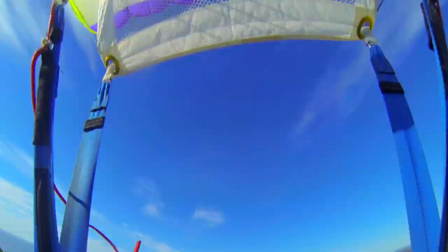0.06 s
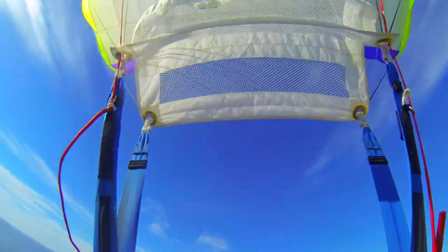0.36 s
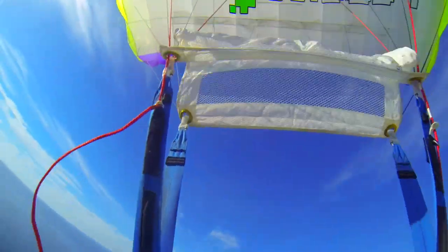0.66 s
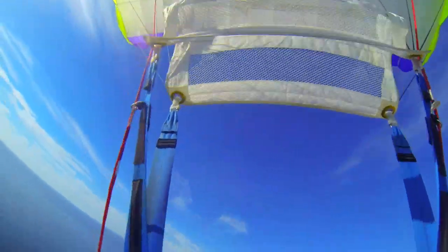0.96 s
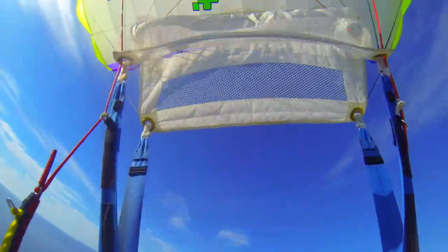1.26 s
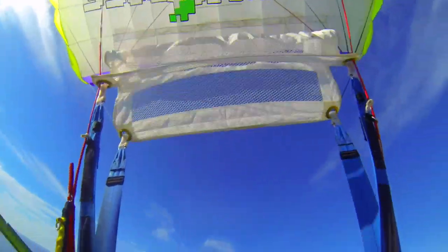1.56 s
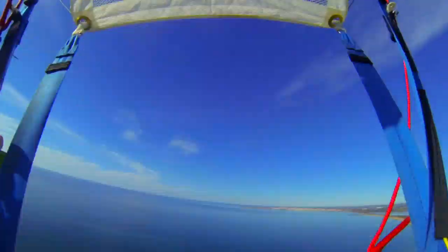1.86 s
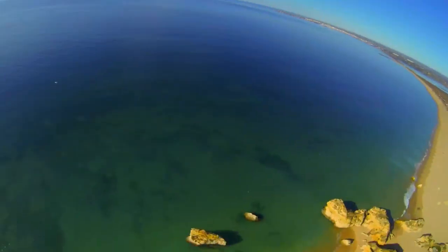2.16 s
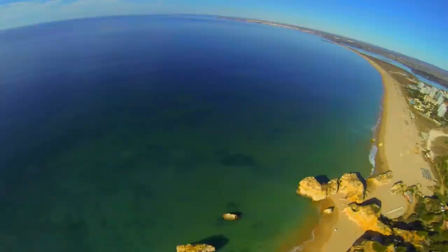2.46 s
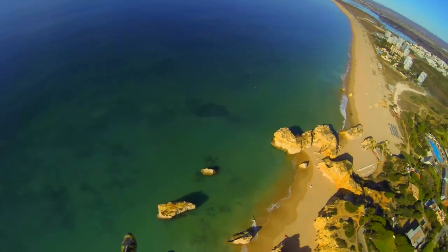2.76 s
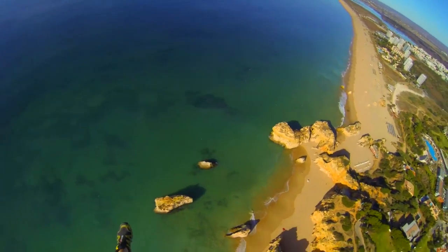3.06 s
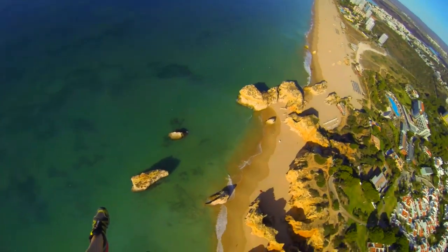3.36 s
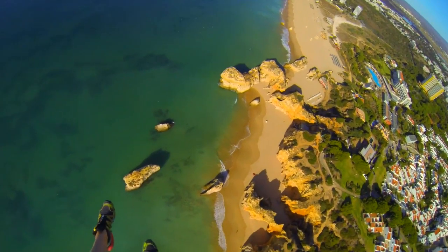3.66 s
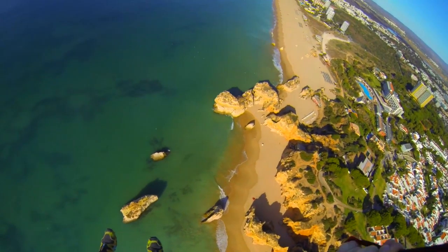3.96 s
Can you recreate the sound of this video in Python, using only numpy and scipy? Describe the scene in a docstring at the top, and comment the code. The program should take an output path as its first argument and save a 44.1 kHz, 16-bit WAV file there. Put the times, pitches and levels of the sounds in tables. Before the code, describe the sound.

A hollow rush of air buffets a camera microphone during a paraglider flight while the wing rustles lightly. Close bumps and rubs on the case lead to a loud knock, a brief lull and a sharp snap, then the wind comes back.

```python
"""Under a paraglider, above the coast. Air rushes past a small cased camera and buffets its microphone
with a low boom. A line sings faintly in the wind; the fabric rustles, ticks and swishes.
A hand turns the camera from the wing to the coast below: the case is bumped, knocked and rubbed,
and a finger slips off with a snap. The rush dips just after the loudest knock, then comes back."""
import sys
import numpy as np
from scipy import signal
from scipy.fft import rfft, irfft
from scipy.io import wavfile
from scipy.ndimage import uniform_filter1d

SR = 44100
rng = np.random.default_rng(int(sys.argv[2]) if len(sys.argv) > 2 else 0)


def file_out(sig):
    """Save sig as 16-bit WAV at sys.argv[1]."""
    # one column per channel
    cols = np.atleast_2d(sig).T
    # limit, then scale
    lim = np.clip(cols, -1, 1)
    pcm = np.round(lim * 32767).astype(np.int16)
    wavfile.write(sys.argv[1], SR, pcm)


N = 176400
CLICK_ATTACK_S = 0.00046  # shared by ticks, knocks and the snap


def undb(db):
    """Decibels to gain."""
    return 10 ** (np.asarray(db) / 20)


def noise():
    """White noise at unit level."""
    return rng.standard_normal(N)


def wobble(rate_hz, depth_db):
    """A wandering gain: random sample-and-hold, smoothed twice."""
    hold = int(SR / rate_hz)
    steps = np.repeat(rng.standard_normal(N // hold + 1), hold)
    drift = uniform_filter1d(uniform_filter1d(steps, hold), hold)[:N]
    return undb(depth_db * drift / drift.std())


def colour(x, curve, lo=0, hi=np.inf):
    """Minimum-phase EQ along a (Hz, dB) curve, limited to a band; white noise keeps its level."""
    f = np.maximum(np.arange(N // 2 + 1) * SR / N, 1)
    hz, db = np.array(curve).T
    gain = undb(np.interp(np.log(f), np.log(hz), db)) / (1 + (lo / f) ** 10 + (f / hi) ** 10) + 1e-6
    cepstrum = irfft(np.log(gain / np.sqrt(np.mean(gain ** 2))), N)
    cepstrum[1:N // 2] *= 2
    cepstrum[N // 2 + 1:] = 0
    impulse = irfft(np.exp(rfft(cepstrum)), N)[:N // 10]
    return signal.fftconvolve(x, impulse)[:N]


def resonate(x, hz, width_hz):
    """One resonant peak; white noise keeps its level."""
    return signal.lfilter(*signal.iirpeak(hz, hz / width_hz, SR), x) * np.sqrt(SR / np.pi / width_hz)


def envelope(age, attack, hold, release):
    """Linear attack, then an exponential release once the age passes hold."""
    return np.clip(age / attack, 0, 1) * np.exp(-np.clip((age - hold) / release, 0, 20))


def swell(offset, half_width):
    """A bell-shaped fade in and out."""
    return np.exp(-np.minimum((offset / half_width) ** 2 / 2, 20))


def grains(per_s, spread_db):
    """Random clicks of uneven size, at unit level overall."""
    clicks = (rng.random(N) < per_s / SR) * np.sign(noise())
    clicks *= undb(spread_db * np.minimum(rng.exponential(size=N), 4))
    return clicks / clicks.std()


# EQ of the rushing air inside the case (frequency [Hz], level [dB])
RUSH_EQ = [(150, 4.5), (330, -6.5), (430, -11.5), (600, -6.5), (780, 0.5), (960, -9), (1200, -2.5),
           (1380, -3), (1560, 1), (1830, -1.5), (2020, -3.5), (2300, -0.5), (2560, -3.5), (2850, -22),
           (3500, -13.5), (6000, -65.5)]


def rush():
    """Air streams past the case: hollow noise with a fast flicker."""
    return wobble(rate_hz=70, depth_db=2) * colour(noise(), RUSH_EQ)


# bright EQ of air hiss and fabric (frequency [Hz], level [dB])
HISS_EQ = [(2200, -39), (2900, 4.5), (3400, -4.5), (3900, 5), (4550, -5.5), (5050, -1.5), (5700, -8.5),
           (6500, -11.5), (7600, -9.5), (9200, -12), (10500, -21), (12500, -17), (15000, -44)]
FABRIC_DECAY_S = 0.0021


def hiss():
    """The airy top of the wind, roughened by tiny bursts of rustle."""
    clicks = abs(grains(per_s=58, spread_db=1.5))
    rustle = signal.lfilter([1], [1, -np.exp(-1 / (FABRIC_DECAY_S * SR))], clicks)
    return colour(noise() * (1 + undb(-7) * rustle / rustle.std()), HISS_EQ)


def singing_line():
    """A line sings in the wind on one breathy pitch."""
    return undb(-2) * resonate(noise(), hz=295.3, width_hz=11.5)


# bass-heavy EQ of the buffeting (frequency [Hz], level [dB])
BUFFET_EQ = [(12, -12), (28, 5), (52, -7.5), (73, 0.5), (92, 4), (120, -8), (170, -16.5), (260, -24),
             (380, -27), (700, -34.5), (2000, -109)]


def buffeting():
    """Air churns on the microphone in an unsteady rumble."""
    return wobble(rate_hz=24.91, depth_db=1) * colour(noise(), BUFFET_EQ)


# fader moves of the wind bed (time [s], rush [dB], hiss [dB], buffeting [dB])
WIND_FADERS = [(0, -63, -74.5, -43.5), (.1, -54.5, -68.5, -31.5), (.36, -55, -66.5, -31.5),
               (.48, -54, -71, -40.5), (.62, -53.5, -66, -32), (.78, -50, -64.5, -33.5),
               (1.05, -50.5, -63, -31), (1.33, -52, -65, -35), (1.46, -50.5, -65, -30),
               (1.58, -54, -62.5, -37), (1.88, -49, -63, -29), (2.02, -42.5, -56, -24),
               (2.13, -50.5, -65, -35.5), (2.28, -64.5, -77, -43.5), (2.41, -60, -74.5, -50),
               (2.519, -52.5, -70, -50), (2.87, -59, -77, -42), (3.06, -49.5, -65, -37),
               (3.2, -56, -70, -33.5), (3.6, -54, -68, -31.5), (4, -54, -71, -32.5)]


def wind(t):
    """The wind bed swells and dips; rush and hiss gust together, the line follows the rush fader."""
    times, *levels = np.array(WIND_FADERS).T
    rush_gain, hiss_gain, buffet_gain = (undb(np.interp(t, times, db)) for db in levels)
    gust = wobble(rate_hz=12.053, depth_db=1.47)
    air = rush_gain * rush() + hiss_gain * hiss()
    return gust * air + rush_gain * singing_line() + buffet_gain * buffeting()


# soft fabric swishes (peak time [s], half width [s], hiss [dB], resonance [Hz], resonance level [dB])
SWISH_CUES = [(.77, .025, -64, 1900, -57), (1.46, .022, -62, 7800, -69), (1.99, .035, -56, 4300, -62),
              (2.985, .04, -66, 4700, -58)]


def fabric_swishes(t):
    """Fabric slides: a rounded swell of hiss with one broad resonance."""
    bright, white, swishes = colour(noise(), HISS_EQ), noise(), 0
    for peak_time, half_width, hiss_db, hz, resonance_db in SWISH_CUES:
        texture = undb(hiss_db) * bright + undb(resonance_db) * resonate(white, hz, width_hz=400)
        swishes += swell(t - peak_time, half_width) * texture
    return swishes


# sharp ticks of the wing (time [s], level [dB])
TICK_CUES = [(.170, -52), (0.426, -48.5), (0.451, -52), (.843, -54), (0.878, -47), (.894, -56),
             (1.105, -50), (.976, -39), (1.848, -43.5)]


def fabric_ticks(t):
    """The wing's fabric flicks in short, bright bursts of noise."""
    bursts = sum(undb(db) * envelope(t - start, CLICK_ATTACK_S, 0, FABRIC_DECAY_S)
                 for start, db in TICK_CUES)
    return colour(noise() * bursts, HISS_EQ)


# low modes of case and microphone (frequency [Hz], time to fall 60 dB [s], level [dB])
BOOM_MODES = [(73.2, 0.15, 0.5), (51.3, 0.032, -0.5), (102, 0.058, -8)]


def boom(t, cues, half_width_s, attack_s=0.002):
    """Each rounded push rings the low modes for a few cycles."""
    ring = sum(undb(db) * np.sin(2 * np.pi * hz * t) * np.exp(-np.log(1000) * t / t60)
               for hz, t60, db in BOOM_MODES)
    pushes = np.zeros(N)
    for time, db in cues:
        push = swell(t - time, half_width_s)
        pushes += undb(db) * push / push.sum()
    return signal.fftconvolve(pushes, ring * np.minimum(t / attack_s, 1))[:N]


# puffs of air on the microphone (time [s], push level [dB])
PUFF_CUES = [(0.898, -21.5), (.914, -20), (0.928, -15.5), (0.985, -10), (1.011, -13.5), (1.026, -20.5),
             (1.179, -22.5), (1.93, -22), (2.02, -15), (3.646, -13.5), (3.782, -12), (3.908, -17)]


def air_puffs(t):
    """Wide, soft pushes of air set off the boom."""
    return boom(t, PUFF_CUES, half_width_s=0.0022)


# bumps of hand and harness (time [s], push level [dB])
BUMP_CUES = [(.105, -25), (0.118, -17), (0.238, -15), (0.285, -12.5), (0.294, -30), (1.420, -17),
             (2.081, -13), (2.092, -11), (2.164, -8), (2.465, -23.5), (2.593, -18.5), (2.607, -17),
             (2.623, -17), (2.636, -13), (2.799, -31), (2.814, -19.5), (3.166, -23), (3.35, -27),
             (3.373, -16.5), (3.390, -20), (3.77, -19.5)]


def bumps(t):
    """Short jolts to the case set off the boom."""
    return boom(t, BUMP_CUES, half_width_s=0.0006)


def band_gains(body_db, mid_db, treble_db):
    """Four band gains for one contact; the upper mids are set from mids and treble."""
    upper_mid_db = mid_db + 0.37 * (treble_db - mid_db) - 2.5
    return undb([body_db, mid_db, upper_mid_db, treble_db])[:, None]


# EQ of the case when touched (frequency [Hz], level [dB])
CASE_EQ = [(150, 5.5), (350, -3), (470, -1), (580, -5), (740, -3.5), (950, -7.5), (1250, -0.5),
           (1600, -3.5), (1850, -4.5), (2300, -8.5), (2900, -13), (3400, -16.5), (4300, -20), (5000, -25.5),
           (5600, -29.5), (7000, -35), (9500, -33.5), (11500, -40.5), (15000, -62)]
# edges of the body, mid, upper mid and treble bands (frequency [Hz])
CASE_BANDS = [150, 950, 1700, 2900, 16000]
# early reflections inside the case (delay [s], gain [linear])
CASE_ECHOES = [(.00113, .3), (.00271, -0.25), (.0043, 0.087)]


def case(forces):
    """The case colours contact forces in four bands; all but the lowest echo inside it."""
    bands = zip(forces, CASE_BANDS, CASE_BANDS[1:])
    body, *upper = (colour(force, CASE_EQ, lo, hi) for force, lo, hi in bands)
    direct, n = sum(upper), np.arange(N)
    echoes = sum(gain * np.interp(n - delay * SR, n, direct, left=0) for delay, gain in CASE_ECHOES)
    return body + (direct + echoes) / np.sqrt(1 + sum(gain ** 2 for _, gain in CASE_ECHOES))


# hand, sleeve and straps sliding on the case
# (time [s], length [s], release [s], body [dB], mids [dB], treble [dB], squeak [Hz], squeak level [dB])
RUB_CUES = [(0.098, 0.045, .015, -40.5, -57, -74, 336, -43.5),
            (0.275, 0.043, .03, -41.5, -42, -60, 2280, -50.5),
            (2.026, .1, 0.0084, -42.5, -46, -62, 1600, -59),
            (2.157, 0.0083, 0.061, -38.5, -49.5, -81, 1900, -54),
            (2.59, 0.021, .005, -32, -32.5, -31.5, 1816, -30),
            (2.600, 0.0073, 0.005, -42, -44, -38, 1810, -23),
            (2.618, 0.0066, 0.0018, -28, -27, -27, 1760, -25),
            (2.628, 0.0069, 0.0022, -30.5, -30.5, -27.5, 1778, -31),
            (2.652, 0.0063, 0.0025, -46, -46, -38.5, 7900, -46),
            (2.643, 0.047, .008, -47, -54.5, -59, 1800, -61),
            (3.29, 0.087, 0.011, -51, -51.5, -62.5, 1810, -59),
            (3.342, 0.041, 0.0079, -35, -37.5, -40, 1880, -43),
            (3.383, 0.024, 0.0081, -34.5, -35, -44.5, 687, -32.5),
            (3.408, 0.022, 0.0023, -41, -44, -49, 2030, -43)]


def rubs(t):
    """Stick-slip grains scrape the case in uneven catches; each grip squeaks at its own resonance."""
    friction = grains(per_s=1500, spread_db=2.5) + 0.97 * noise()
    friction *= wobble(rate_hz=350, depth_db=3)  # the slide catches and slips
    friction /= friction.std()
    forces, squeaks = 0, 0
    for start, length, release, *band_db, hz, squeak_db in RUB_CUES:
        scrape = friction * envelope(t - start, attack=0.0027, hold=length, release=release)
        forces += band_gains(*band_db) * scrape
        squeaks += undb(squeak_db) * resonate(scrape, hz, width_hz=65)
    return case(forces) + squeaks


def finger_snap(t, start_s=2.631, hz=1760, decay_s=0.0014, level_db=-8.5):
    """The gripping finger slips off: one hard snap that rings the case briefly."""
    age = t - start_s
    shape = envelope(age, CLICK_ATTACK_S, CLICK_ATTACK_S, decay_s)
    return undb(level_db) * shape * np.sin(2 * np.pi * hz * age)


# knocks on the case (time [s], decay [s], body [dB], mids [dB], treble [dB])
KNOCK_CUES = [(0.048, 0.0051, -39, -43, -74), (0.07, 0.0049, -40, -45.5, -51.5),
              (0.1246, 0.0016, -32, -33.5, -37.5), (0.131, 0.004, -27.5, -38, -62),
              (0.24, 0.004, -16, -33, -48), (.254, 0.014, -30.5, -44, -57),
              (0.284, 0.0056, -15, -22.5, -56), (1.377, 0.0064, -38.5, -58, -72),
              (1.419, 0.011, -33, -45, -74), (2.082, 0.0079, -18, -38, -54), (2.104, .008, -27, -34, -51),
              (2.113, 0.0054, -18.5, -23.5, -43), (2.145, 0.0028, -3, -10.5, -39),
              (2.147, .003, -39, -30, -34), (2.167, 0.0016, -20, -29.5, -37),
              (2.244, 0.0042, -26.5, -42, -56.5), (2.303, 0.013, -46, -56, -64),
              (2.383, 0.0058, -45, -53, -72), (2.568, .012, -42, -60, -76),
              (2.467, 0.0042, -27.5, -43, -53), (2.474, 0.0024, -37, -36, -30.5),
              (2.619, 0.0032, -49, -20.5, -21.5), (2.629, 0.0031, -14, -24, -26),
              (2.715, 0.0013, -50, -44, -48), (2.766, .004, -53, -54, -47.5),
              (2.803, 0.0052, -28, -29.5, -33.5), (2.870, 0.0024, -43, -51, -69),
              (3.150, .005, -38.5, -53, -57), (3.168, 0.0045, -31.5, -48, -61),
              (3.276, 0.0034, -31, -36.5, -49), (3.347, 0.002, -21, -34, -51),
              (3.369, .004, -16.5, -26, -59), (3.396, 0.0048, -14, -32, -49), (3.409, .005, -31, -38, -42),
              (3.693, 0.0053, -25, -36, -51), (3.762, 0.008, -32, -63, -72),
              (3.773, 0.0048, -24.5, -42, -78), (3.794, 0.0045, -34, -42, -70),
              (3.901, 0.0054, -35.5, -65, -77)]


def knocks(t, blow_gain=0.54, grit_gain=0.68):
    """Each knock hits the case with a clean transient and a few milliseconds of grit."""
    forces, grit = np.zeros((4, N)), noise()
    for start, decay, *band_db in KNOCK_CUES:
        contact = grit_gain * grit * envelope(t - start, CLICK_ATTACK_S, CLICK_ATTACK_S, decay)
        contact[int((start + CLICK_ATTACK_S) * SR)] += blow_gain * np.sqrt(decay * SR / 2)
        forces += band_gains(*band_db) * contact
    return case(forces)


def scene():
    """Air, handling and fabric, mixed in mono at the microphone."""
    t = np.arange(N) / SR
    air = wind(t) + air_puffs(t)
    handling = bumps(t) + knocks(t) + rubs(t) + finger_snap(t)
    fabric = fabric_ticks(t) + fabric_swishes(t)
    return (air + handling + fabric)[None]


def record(dry):
    """The deepest rumble is rolled off, and the camera cuts the top steeply."""
    low_cut = signal.butter(1, 17, "high", fs=SR, output="sos")
    high_cut = signal.ellip(8, .2, 70, 15300, fs=SR, output="sos")
    return signal.sosfilt(high_cut, signal.sosfilt(low_cut, dry))


dry = scene()
out = record(dry)
file_out(out)
```